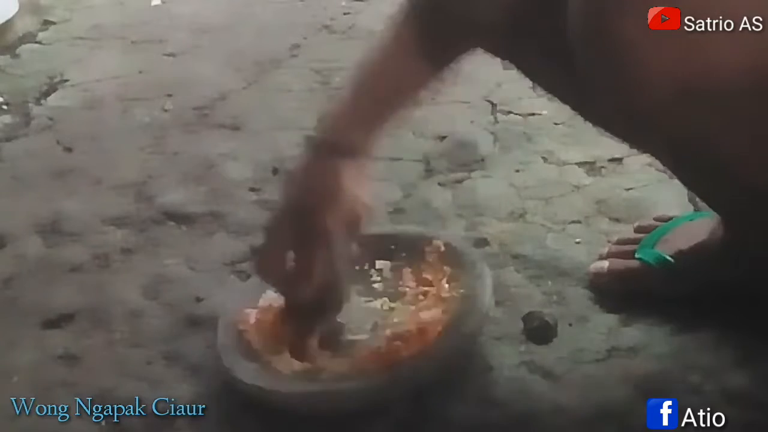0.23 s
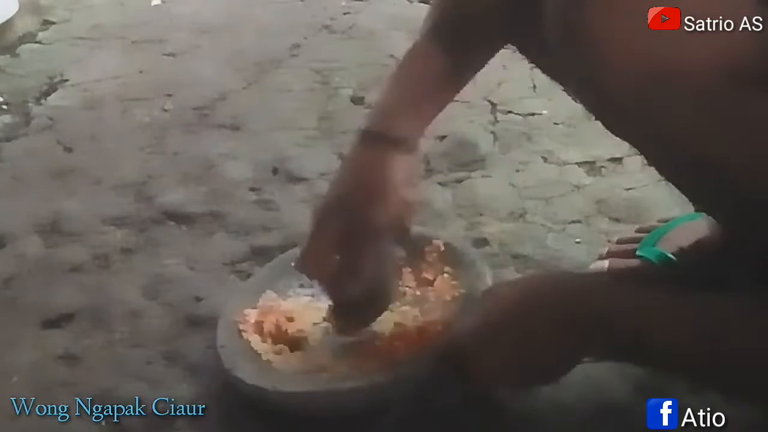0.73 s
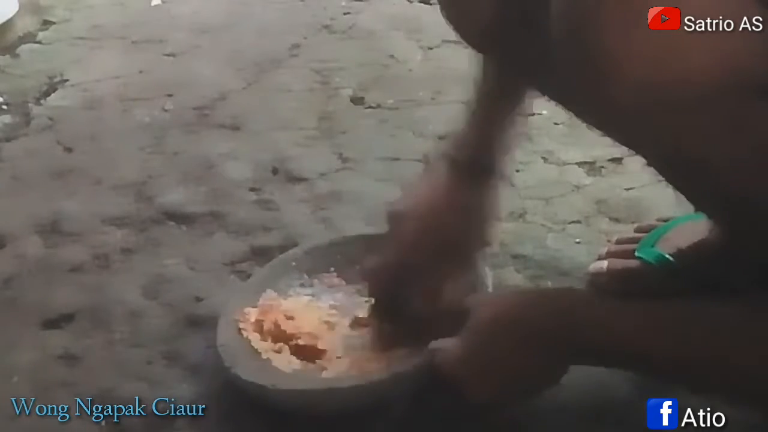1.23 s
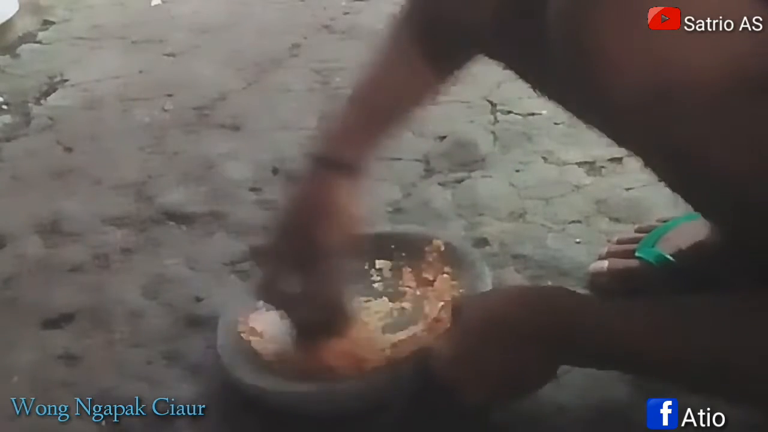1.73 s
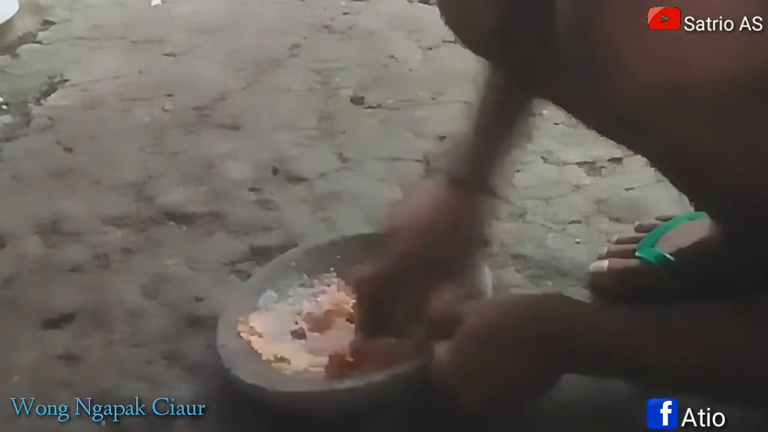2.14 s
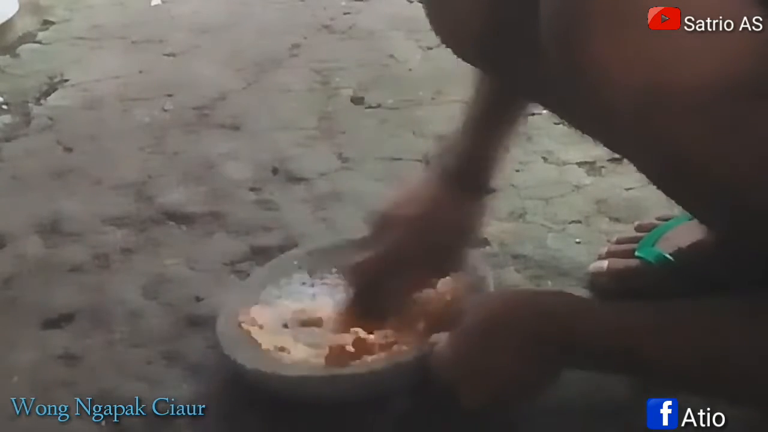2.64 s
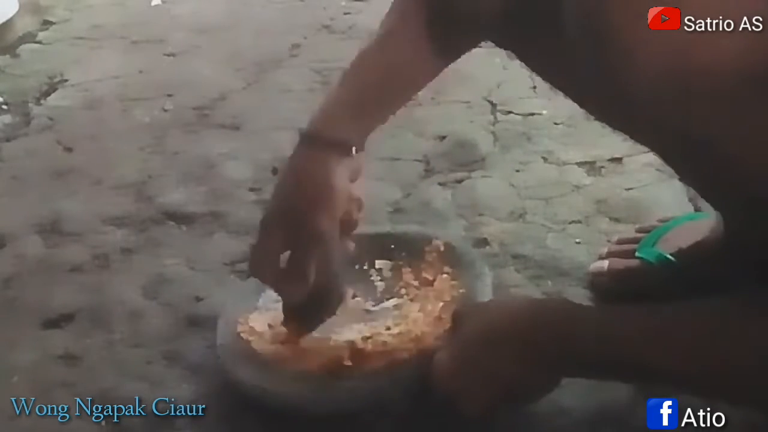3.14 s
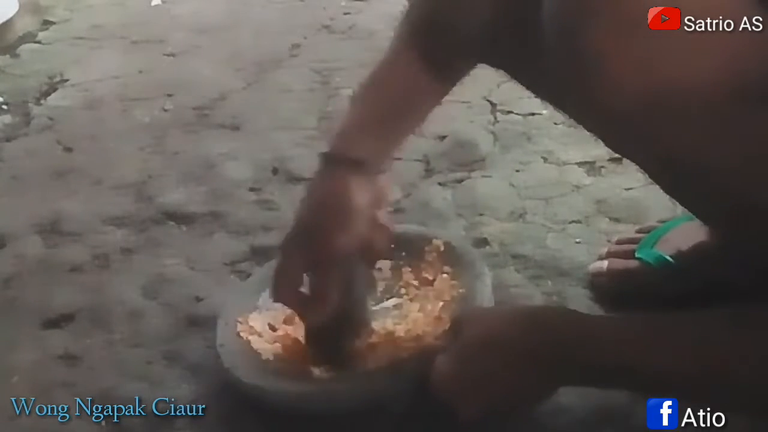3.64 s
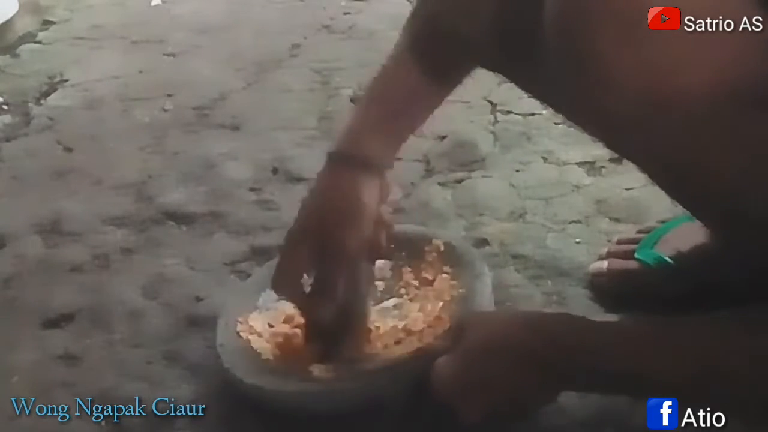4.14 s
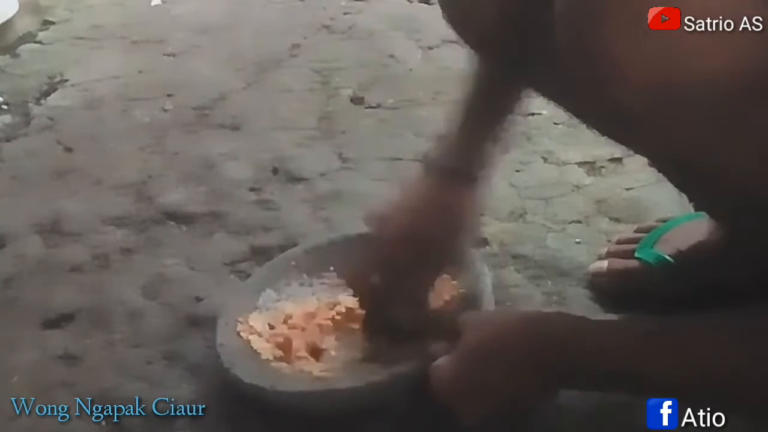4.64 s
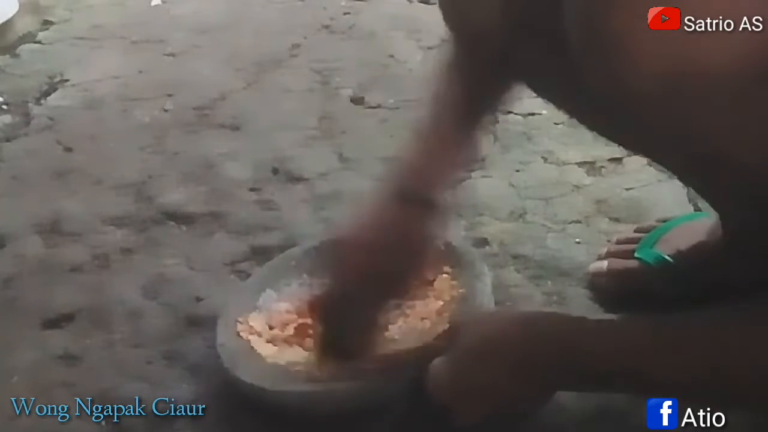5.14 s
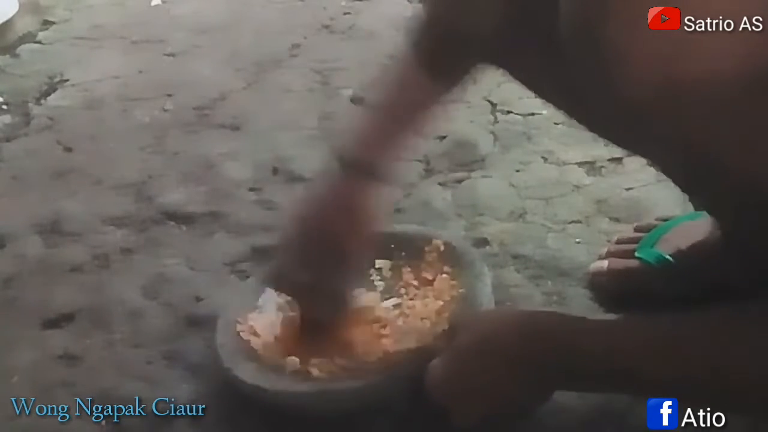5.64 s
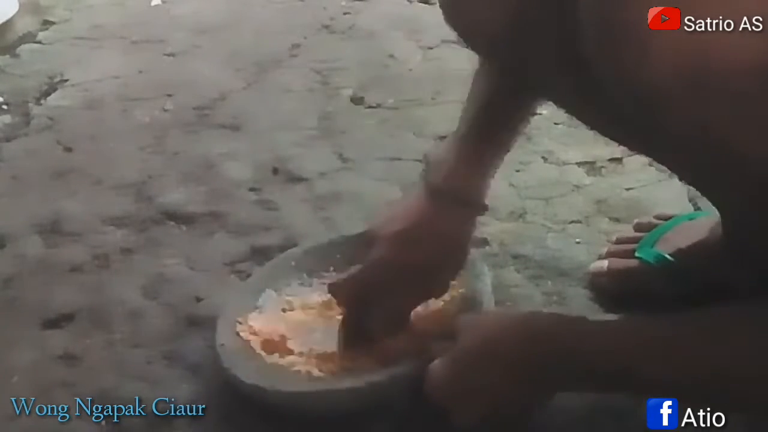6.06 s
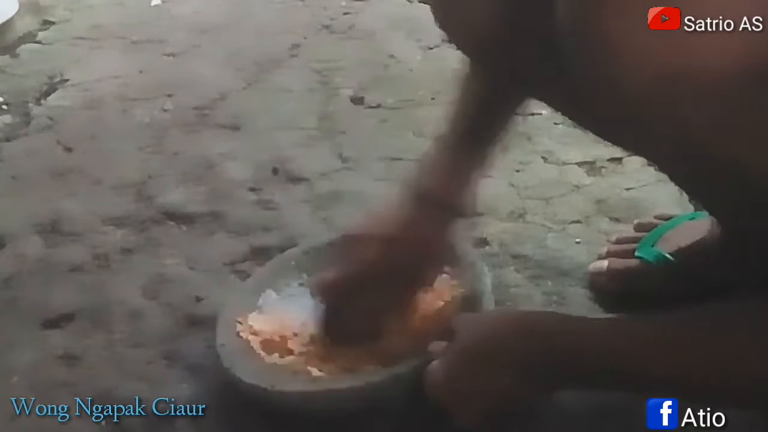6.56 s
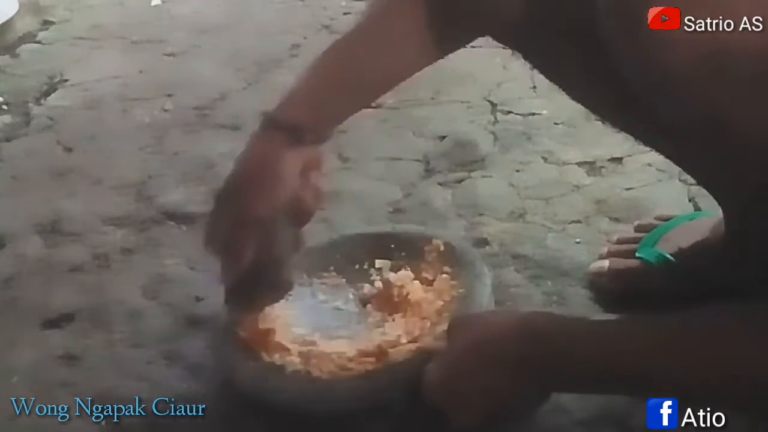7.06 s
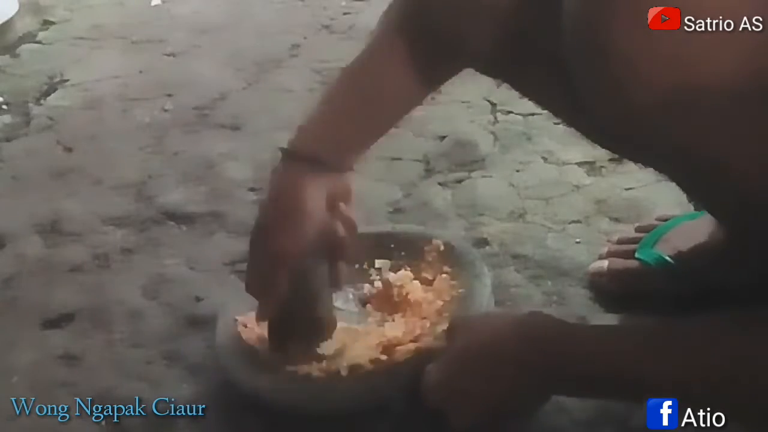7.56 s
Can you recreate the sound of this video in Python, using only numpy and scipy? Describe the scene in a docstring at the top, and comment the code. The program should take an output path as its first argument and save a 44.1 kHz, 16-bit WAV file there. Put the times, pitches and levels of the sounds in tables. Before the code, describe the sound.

Close up in a small room, a stone pestle works wet spices in a shallow stone mortar. Short gritty scrapes alternate with dry, bright clacks, densest around three seconds. Two harder knocks follow, then lighter rubbing, before stronger grinding returns near six seconds. Moist paste rustles, seeds snap, and the bowl occasionally thumps the hard floor over low hum and faint hiss.

```python
"""Stone rings on stone: a pestle pounds and grinds wet spices in a shallow mortar on a hard floor.
Blows and random grit clicks excite the bowl's modes; the paste rustles in clumped grains and snaps
in puffs of noise; the mortar rocks and thumps the floor in damped sines. A small room answers with
decaying noise, over a wavering mains hum, low rumble, hiss and a faint whistle."""
import sys
import numpy as np
from scipy import signal
from scipy.fft import rfft, irfft, next_fast_len
from scipy.io import wavfile

SR = 44100
rng = np.random.default_rng(int(sys.argv[2]) if len(sys.argv) > 2 else 0)


def master_out(mix):
    """Clip the mix to full scale and print it as 16-bit PCM to the path in sys.argv[1]."""
    frames = np.transpose(np.atleast_2d(mix))
    ceiling = np.clip(frames, -1, 1)
    pcm = np.round(ceiling * 32767).astype(np.int16)
    wavfile.write(sys.argv[1], SR, pcm)


N = 343539   # length in samples

# Modes of the stone, in families that the contact point favours differently.
# Each row: frequency in Hz, relative level in dB, time to fall 60 dB in seconds.
LOW_RING_MODES = [(640, -18, 0.03), (728, -11.5, 0.027), (817, -6, 0.026), (898, -9, 0.056),
                  (974, -10.5, 0.045), (1089, -3.5, 0.086), (1091, 6.5, 0.018), (1185, 0, 0.013),
                  (1302, -19, 0.094), (1374, -15, 0.051), (1482, -10, 0.028), (1718, -14.5, 0.075),
                  (1962, -12, 0.012)]
MAIN_RING_MODES = [(1846, -10, 0.01), (2163, -10.5, 0.056), (2268, -1.5, 0.021), (2382.5, 2, 0.024),
                   (2442.3, 7, 0.029), (2467.5, 10.5, 0.016), (2703, -12, 0.017), (2713, -17, 0.076),
                   (2850, -16.5, 0.04)]
UPPER_RING_MODES = [(3120, -10, .01), (3508, 3.5, 0.012), (3602, 4, 0.027), (3788, 1.5, 0.015),
                    (4120, -4.5, 0.012), (4680, -5.5, 0.0094), (5350, 2.5, 0.0051), (5865, -3.5, 0.017)]
# Overtones that sound with the main ring. Each row: as for the modes above.
MAIN_RING_OVERTONES = [(5464, -3.5, 0.011), (6160, -5.5, 0.02), (8620, -18, 0.017), (11700, -21.5, 0.0074)]


def mortar():
    """The bowl's ring: each family of modes gets its own share of every stroke and blow."""
    _, low_blow, main_blow, upper_blow = np.transpose(PESTLE_BLOWS)
    low, main, upper, _, low_lean, main_lean = np.transpose(GRINDING_STROKES)[3:]
    low_db, low_tilt = stroking(low, lean=low_lean)
    main_db, main_tilt = stroking(main, lean=main_lean)
    upper_db, _ = stroking(upper, lingers=UPPER_LINGERS)
    low_ring = family(LOW_RING_MODES, low_db, low_blow - 17, low_tilt, np.minimum, hard=True)
    main_ring = family(MAIN_RING_MODES, main_db, main_blow - 13, main_tilt, np.maximum, hard=False)
    upper_ring = family(UPPER_RING_MODES, upper_db, upper_blow - 13, 0, np.maximum, hard=False)
    overtones = family(MAIN_RING_OVERTONES, main_db - 26, main_blow - 34, 0, np.maximum, hard=False)
    return low_ring + main_ring + upper_ring + overtones


# The pestle strikes the stone. Each row: start in seconds, then the relative strength in dB
# of the low ring, the main ring and the upper rings.
PESTLE_BLOWS = [(0.012, -9.5, 4, -27), (0.686, -4.5, -15, -27), (1.188, -24, -4.5, -14),
                (1.209, -25, -3, -37), (1.41, -11, -18, -36), (2.011, -26.5, -9, -29.5),
                (2.165, -32, -21, -36), (2.18, -24.5, -3, -36), (2.551, -2.5, -10, -44),
                (2.591, -22, -11, -24), (2.606, -15, 0.5, -40), (2.807, -44, -13, -19),
                (2.818, -5, -23, -35), (2.922, -20, 2.5, -36), (2.942, -22, 9, -27), (2.972, -22, 4, -30),
                (3.129, -24, 1, -32), (3.426, 6, -5, -23.5), (3.53, -22.5, -10.5, -34),
                (3.946, 0.5, 0, -24), (4.724, -29.5, -18, -34.5), (5.149, -34, -26, -36.5),
                (5.349, -38, -26.5, -27), (5.416, -16, -26.5, -27), (5.762, -30, -15.5, -27),
                (5.806, -35, -10.5, -28), (6.06, -23, 0, -35), (6.084, -19, 0.5, -38),
                (6.423, -4.5, -20, -35), (6.793, -28.5, -26, -34), (6.809, -14, -3.5, -39),
                (6.822, -15, 8.5, -32), (6.835, -24.5, 5.5, -35.5), (7.49, -41, -16.5, -20),
                (7.523, -15, -12, -13.5)]
GRIT_PER_S = 900   # mean clicks per second
CHATTER, CHATTER_T60_S = 0.19, 0.012   # noise spread relative to the blow; seconds to fall 60 dB


def family(modes, grind_db, blow_db, tilt, side, hard):
    """Grit under the stroke and the blows drive damped resonances, one for each mode."""
    hz, level_db, t60 = np.transpose(modes)
    # energy of the rings after a unit click, so the grit keeps its level whatever the modes
    energy = np.sum(from_db(level_db) ** 2 * t60) * SR / (4 * np.log(1000))
    grit = grains(GRIT_PER_S, spread_db=3.5, clump_db=1.5) * from_db(grind_db) / np.sqrt(energy)
    strengths = from_db(rng.normal(0, 1.5, (len(PESTLE_BLOWS), len(modes))))
    roughness = CHATTER * rng.standard_normal(N)
    octaves = side(np.log2(hz / hz[len(hz) // 2]), 0)   # only one side of the middle mode tilts
    out = np.zeros(N)
    for k in range(len(modes)):
        sign = (-1) ** k
        start = 1 if hard else sign   # modes that start together crack, opposed ones swell
        blows = at_times(PESTLE_BLOWS, start * from_db(blow_db) * strengths[:, k])
        chatter = roughness * dying(blows, CHATTER_T60_S)   # rough stone keeps touching for a moment
        mode_db = level_db[k] + tilt * octaves[k] + 2.2 * drift(6.5)
        force = (grit * sign + blows + chatter) * from_db(mode_db)
        out += ring(force, hz[k], t60[k])
    # the stone radiates little outside the family's range
    return signal.sosfilt(signal.butter(2, [0.8 * hz[0], 1.51 * hz[-1]], "band", fs=SR, output="sos"), out)


# Grinding strokes, each a swell and a fade. Each row: peak time, rise and fall in seconds, then the
# relative level in dB of the low ring, main ring, upper rings and paste rustle, then the lean of the
# contact point: the tilt in dB per octave of the modes below the middle low mode (positive weakens
# them) and of those above the middle main mode (positive strengthens them).
GRINDING_STROKES = [(.016, 0.0083, 0.099, -26, -10, -26.5, -37.5, -15.5, -8.5),
                    (0.089, 0.043, 0.036, -29.5, -27, -34.5, -56, -14, -12),
                    (.25, 0.12, 0.078, -40, -30, -42.5, -38, -7.5, -16),
                    (0.504, 0.011, .1, -49.5, -66, -43.5, -51, 4, -6),
                    (.66, 0.053, 0.032, -36.5, -21, -35, -37.5, -5, 10),
                    (0.689, 0.012, 0.11, -33.5, -37, -40.5, -46, -13, 24),
                    (.96, 0.059, 0.054, -57, -69, -48.5, -60, -8, -6),
                    (1.1, 0.07, 0.043, -40, -29, -34.5, -35, -20.5, -3),
                    (1.198, 0.019, 0.07, -26, -9, -26, -33.5, -16.5, -39),
                    (1.415, 0.062, 0.061, -28, -26, -36, -34.5, -9, 18),
                    (1.73, .01, 0.2, -41.5, -50, -46.5, -46, 14, -7),
                    (1.829, .07, 0.057, -38.5, -30.5, -36, -42, 13.5, -5),
                    (1.93, 0.11, 0.089, -54, -40, -48, -40.5, 5, 0),
                    (2.02, 0.036, 0.062, -26.5, -21, -33, -39.5, -14.5, 24),
                    (2.189, 0.052, 0.042, -27.5, -10, -29.5, -45, -3, -21),
                    (2.349, 0.1, 0.062, -36, -30, -41.5, -34.5, 8, -4),
                    (2.561, 0.0096, 0.05, -9, -27, -31.5, -47, -0.5, 35),
                    (2.609, 0.04, .06, -20.5, -16, -25.5, -55, -7, -9),
                    (2.709, 0.1, 0.052, -53, -37, -52, -33, -8, -5),
                    (2.814, 0.064, 0.078, -35, -16.5, -32, -41, -3, -4),
                    (2.943, 0.03, 0.061, -19.5, -5, -22.5, -35, -16.5, -26),
                    (3.09, 0.03, 0.1, -59, -37, -37, -42.5, -6, 0),
                    (3.134, .015, 0.04, -19, -14.5, -27.5, -43, -14.5, 6.5),
                    (3.433, 0.0064, 0.078, -13.5, -28, -41, -66, 37, 76),
                    (3.55, 0.077, 0.076, -27, -29.5, -36.5, -41, -3, 51),
                    (3.965, .015, 0.08, -15.5, -14.5, -44, -60.5, 43, 49),
                    (4.085, 0.069, 0.064, -25, -26, -34.5, -39.5, -9.5, 19),
                    (4.42, .008, 0.035, -57, -57.5, -48.5, -54, -13, 0),
                    (4.58, 0.1, 0.067, -47.5, -35.5, -44.5, -41.5, -24.5, -3),
                    (4.693, 0.025, .03, -45.5, -24.5, -39, -44, -14, -1),
                    (4.729, 0.019, 0.03, -37.5, -32, -41, -40.5, -4, -3),
                    (4.88, 0.094, 0.054, -49.5, -32, -44.5, -39.5, -10, 0),
                    (5.155, .005, 0.15, -42, -48.5, -50, -51, 10, 59),
                    (5.24, .05, 0.099, -42.5, -37, -46, -48.5, 5, 34),
                    (5.361, 0.023, 0.063, -44, -31.5, -39, -34, 10, 0),
                    (5.42, 0.12, 0.013, -39, -30.5, -39, -48.5, 2, 3),
                    (5.67, .005, .08, -64, -50, -64, -59.5, 6, 0),
                    (5.715, .03, 0.077, -44.5, -65, -49, -53, 4, 0),
                    (5.81, 0.074, 0.043, -45, -33, -48, -36.5, -23, -3),
                    (5.93, 0.073, 0.098, -38, -26.5, -40, -43, -16.5, 0),
                    (6.08, .035, 0.058, -34, -9.5, -27.5, -38, -14, -7),
                    (6.23, .07, 0.048, -50.5, -24.5, -37, -39, -17, 0),
                    (6.429, 0.0054, 0.096, -25.5, -34, -40.5, -60, -3.5, 52),
                    (6.54, 0.087, .07, -58, -31, -39, -37.5, 6, -19.5),
                    (6.68, 0.096, 0.095, -42, -27, -41, -37, -3, -18),
                    (6.8, 0.022, .04, -25, -21.5, -37.5, -42.5, -9.5, -10.5),
                    (6.828, 0.019, 0.041, -26, -5.5, -22, -31.5, -12, -7),
                    (7.0, 0.21, 0.033, -61, -33, -52, -46.5, -9, -5),
                    (7.25, .025, 0.065, -41.5, -56, -51, -46.5, 4, 6),
                    (7.37, 0.079, 0.08, -52.5, -39, -44.5, -47, -1, 1),
                    (7.513, 0.042, 0.04, -27.5, -21, -38, -33, 18, 8),
                    (7.7, 0.033, 0.3, -67, -49.5, -56.5, -62, -13, 10)]
SWELL_DB = 20   # slope of the swell per rise and of the fade per fall
UPPER_LINGERS, RUSTLE_LINGERS = 1.07, 1.59   # these swell and fade more slowly than the other rings
ROUNDING = 0.15   # how far the top of a stroke is rounded, in rises or falls
TRAIL_DB, TRAIL_LINGERS = -17.5, 2.2   # a light rub trails after every stroke


def stroking(level_db, lingers=1, lean=0):
    """Level in dB and lean in time: overlapping strokes add in power, the loudest weighs most on the lean."""
    peak, rise, fall = np.transpose(GRINDING_STROKES)[:3, :, None]
    t = np.arange(0, N + 40, 40) / SR - peak
    away = np.where(t < 0, -t / rise, t / fall) / lingers
    away = np.hypot(away, ROUNDING) - ROUNDING
    trail_away = away / np.where(t < 0, 1, TRAIL_LINGERS)
    stroke_power = from_db(level_db[:, None] - SWELL_DB * away).T ** 2 + 1e-18
    trail_power = from_db(level_db[:, None] + TRAIL_DB - SWELL_DB * trail_away).T ** 2
    power = stroke_power + trail_power
    total = power.sum(axis=1)
    return per_sample(10 * np.log10(total)), per_sample((lean * power).sum(axis=1) / total)


# Colour of the wet rustle. Each row: frequency in Hz, relative spectral level in dB.
RUSTLE_COLOUR = [(1500, 3.5), (3000, 10), (6500, 3.5), (8500, -5.5), (11000, -4.5), (14800, -12.5),
                 (16000, 16)]
RUSTLE_PER_S = 2700   # mean grains per second


def paste_rustle():
    """Fine wet grains rustle under each stroke as clumped clicks in a shifting colour."""
    level_db, _ = stroking(np.transpose(GRINDING_STROKES)[6], lingers=RUSTLE_LINGERS)
    wet_grains = colour(grains(RUSTLE_PER_S, spread_db=1.0, clump_db=2.5), RUSTLE_COLOUR)
    return from_db(level_db) * rms_one(patchy(wet_grains, patch_db=3.5))


# Whole seeds snap in the paste. Each row: start in seconds, relative body level in dB,
# relative treble level in dB.
SEED_SNAPS = [(0.021, -31, -44.5), (0.4998, -18.5, -37), (0.6868, -26, -59), (1.1864, -9, -46),
              (1.4141, -9.5, -21.5), (1.724, -24, -54), (2.0099, -12.5, -46), (2.164, -45, -47),
              (2.1804, -35, -49), (2.249, -13, -50), (2.301, -19, -53), (2.5528, -21, -47),
              (2.591, -48, -53), (2.7673, -16, -50), (2.821, -14.5, -62), (2.9203, -33, -40),
              (3.128, -34.5, -39.5), (3.424, -47, -44), (3.734, -28, -84), (3.9464, -20.5, -55.5),
              (4.253, -29.5, -77), (4.418, -18, -37.5), (4.555, -18, -57), (4.6907, -31, -56),
              (4.9415, -20, -47), (5.3526, -34, -22.5), (5.807, -26, -47), (5.888, -21, -57),
              (6.0492, -42, -55), (6.083, -30, -48), (6.2126, -17, -53), (6.5999, -18.5, -52),
              (6.796, -24, -53), (6.8089, -33, -43), (7.2185, -25, -59.5), (7.463, -15, -49),
              (7.518, -21, -51)]


def seed_snaps():
    """A snapping seed gives a puff of body noise and a shorter puff of treble noise."""
    _, body_db, treble_db = np.transpose(SEED_SNAPS)
    body = bursts(body_db - 12, 3500, 6500, t60=0.011)
    treble = bursts(treble_db - 5, 6760, 16000, t60=0.0078)
    return body + treble


def bursts(level_db, low_hz, high_hz, t60):
    """Each snap opens band-limited noise that dies at once."""
    band = signal.butter(2, [low_hz, high_hz], "band", fs=SR, output="sos")
    noise = rms_one(signal.sosfilt(band, rng.standard_normal(N)))
    return dying(at_times(SEED_SNAPS, from_db(level_db)), t60) * noise


# The mortar thumps the floor. Each row: start in seconds, relative level in dB, pitch in Hz.
FLOOR_THUMPS = [(0.685, -9.5, 174.6), (1.094, -18, 165), (1.408, -10, 170), (2.551, -23, 157),
                (2.817, -6, 180.6), (3.422, -26.5, 189), (3.619, -22, 148), (3.945, -29.5, 187),
                (4.137, -28, 187), (5.148, -31, 172), (5.751, -24, 153), (6.422, -25, 146),
                (7.499, -18, 145)]
# Modes of the floor. Each row: ratio to the thump's pitch, relative level in dB, cycles to fall 60 dB.
FLOOR_MODES = [(1.0, -2.5, 12.2), (1.33, -6.5, 12.0), (2.098, -19.5, 12.0), (3.4, -18.5, 8.1)]
THUMP_CUT_HZ = 130


def thumps():
    """The floor under the mortar answers with a few heavily damped modes and radiates no deep bass."""
    rings = np.zeros(N)
    for ratio, level_db, cycles in FLOOR_MODES:
        rings += from_db(level_db) * short_rings(FLOOR_THUMPS, ratio, cycles)
    return -signal.sosfilt(signal.butter(2, THUMP_CUT_HZ, "high", fs=SR, output="sos"), rings)


def short_rings(rows, ratio, cycles):
    """Each event rings a few cycles of a decaying sine at a multiple of its own pitch."""
    out = np.zeros(N)
    for s, level_db, pitch in rows:
        hz = ratio * pitch
        turns = np.arange(int(cycles / hz * SR)) / SR * hz
        sine = from_db(level_db - 60 * turns / cycles) * np.sin(2 * np.pi * turns)
        start = int(s * SR)
        part = out[start:start + len(turns)]
        part += sine[:len(part)]
    return out


ROOM_T60_S, TREBLE_T60_S, WALL_CUT_HZ = 0.32, 0.091, 1200   # decays below and above the wall cut
ROOM_DB, ROOM_GAP_S = -2, 0.0038   # level of the answer, silence before its first echo


def room(x):
    """The small room gives a dense cloud of echoes after a short gap; the treble dies sooner."""
    t = np.arange(SR // 2) / SR
    echoes = rng.standard_normal(len(t))
    dull = signal.sosfilt(signal.butter(1, WALL_CUT_HZ, fs=SR, output="sos"), echoes)
    bright = echoes - dull
    answer = dull * from_db(-60 * t / ROOM_T60_S) + bright * from_db(-60 * t / TREBLE_T60_S)
    answer *= (t > ROOM_GAP_S) / np.sqrt(SR * ROOM_T60_S / (2 * np.log(1000)))   # scale by the long decay
    return signal.fftconvolve(x, answer)[:N]


HUM_HZ, HUM_DB = 98.6, -44


def hum():
    """Mains hum: one steady sine whose level wavers."""
    sine = np.sqrt(2) * np.sin(2 * np.pi * HUM_HZ * np.arange(N) / SR)
    return sine * from_db(HUM_DB + 1.6 * drift(3.0))


# Colour of the low rumble. Each row: frequency in Hz, relative spectral level in dB.
RUMBLE_COLOUR = [(15, -53.5), (25, -3.5), (48, -8), (104, 0), (151, -2), (412, -9), (700, -29), (910, -61),
                 (1540, -120)]
# The rumble swells as the mortar is pressed on the floor. Each row: time in seconds, mean level in dB.
FLOOR_PRESSURE = [(0.0, -44), (.7, -43.5), (1.6, -42.5), (2.75, -40), (3.3, -47.5), (4.4, -50.5),
                  (4.7, -47), (5.9, -43.5), (6.6, -44.5), (7.79, -45)]


def rumble():
    """Low coloured noise follows the pressure on the floor, with small chance lumps in level."""
    s, pressed_db = np.transpose(FLOOR_PRESSURE)
    level_db = np.interp(np.arange(N) / SR, s, pressed_db) + 1.5 * drift(5)
    return rms_one(colour(rng.standard_normal(N), RUMBLE_COLOUR)) * from_db(level_db)


# Colour of the hiss. Each row: frequency in Hz, relative spectral level in dB.
HISS_COLOUR = [(290, -48), (500, -14.5), (708, -23), (1050, -18), (1160, -6), (1340, -20.5), (1840, -29),
               (2770, -18.5), (3150, -34.5), (3920, -13), (4340, -36), (14900, -35.5), (16000, -37)]
HISS_DB = -60


def hiss():
    """Coloured noise, nearly steady in level."""
    return rms_one(colour(rng.standard_normal(N), HISS_COLOUR)) * from_db(HISS_DB + 0.51 * drift(2.7))


WHISTLE_HZ, WHISTLE_T60_S, WHISTLE_DB = 4190, 0.021, -75


def whistle():
    """Noise through one narrow resonance gives a faint, unsteady high tone."""
    tone = rms_one(ring(rng.standard_normal(N), WHISTLE_HZ, WHISTLE_T60_S))
    return tone * from_db(WHISTLE_DB + 2.4 * drift(2.5))


def from_db(db):
    """Decibels to an amplitude factor."""
    return 10 ** (np.asarray(db) / 20)


def rms_one(x):
    """Scales a sound to an rms of 1."""
    return x / np.sqrt(np.mean(x ** 2) + 1e-20)


def per_sample(slow):
    """Stretches a control known at every 40th sample."""
    return np.interp(np.arange(N) / 40, np.arange(len(slow)), slow)


def drift(rate):
    """Slow chance: noise through a double one-pole low-pass at a rate in Hz, rms 1."""
    r = np.exp(-2 * np.pi * rate * 40 / SR)
    noise = rng.standard_normal(N // 40 + 2002)
    slow = signal.lfilter([1], [1, -2 * r, r * r], noise)[2000:]   # drop the filter's start-up
    return per_sample(rms_one(slow))


def ring(clicks, hz, t60):
    """A two-pole resonance: a unit click sets a decaying sine of about height 1 ringing."""
    r, w = from_db(-60 / (t60 * SR)), 2 * np.pi * hz / SR
    return signal.lfilter([0, np.sin(w)], [1, -2 * r * np.cos(w), r * r], clicks + 1e-18)


def dying(clicks, t60):
    """Each click opens an envelope that decays by 60 dB in t60 seconds."""
    return signal.lfilter([1], [1, -from_db(-60 / (t60 * SR))], clicks + 1e-18)


def at_times(rows, values):
    """A click train with one value per table row."""
    train = np.zeros(N)
    train[(np.array(rows)[:, 0] * SR).astype(int)] = values
    return train


def grains(per_s, spread_db, clump_db):
    """Random clicks of uneven size and either sign, with swelling clumps; rms 1."""
    sizes = from_db(spread_db * np.minimum(rng.exponential(1, N), 4)) * rng.choice([-1, 1], N)
    present = rng.random(N) < per_s / SR
    return rms_one(sizes * present * from_db(clump_db * drift(40)))


def colour(x, spectrum):
    """Filters a sound by a spectrum drawn through (Hz, dB) points on a log frequency axis."""
    size = next_fast_len(N)
    hz, level_db = np.transpose(spectrum)
    axis = np.log(np.arange(size // 2 + 1) * SR / size + 1)
    gain = from_db(np.interp(axis, np.log(hz), level_db))
    return irfft(rfft(x, size) * gain, size)[:N]


def patchy(x, patch_db):
    """Ten bands, each about a third of an octave, swell and fade by themselves, so the colour shifts."""
    edges = np.geomspace(1500, 17000, num=11)
    out = np.zeros(N)
    for k, edge in enumerate(zip(edges, edges[1:])):
        band = signal.sosfilt(signal.butter(2, edge, "band", fs=SR, output="sos"), x)
        out += (-1) ** k * band * from_db(patch_db * drift(3.3))
    return out


def scene():
    """Mortar, paste and floor sound directly and through the room, over the background."""
    near = mortar() + paste_rustle() + seed_snaps() + thumps()
    background = hum() + rumble() + hiss() + whistle()
    return (near + from_db(ROOM_DB) * room(near) + background)[None]


MIC_CUT_HZ, CUTOFF_HZ = 35, 16200


def record(dry):
    """The microphone drops the deep bass, peaks are rounded, the top is cut."""
    thin = signal.sosfilt(signal.butter(2, MIC_CUT_HZ, "high", fs=SR, output="sos"), dry)
    rounded = 0.93 * np.tanh(thin / 1.111)
    return signal.sosfilt(signal.cheby2(12, 60, CUTOFF_HZ, fs=SR, output="sos"), rounded)


dry = scene()
out = record(dry)
master_out(out)
```